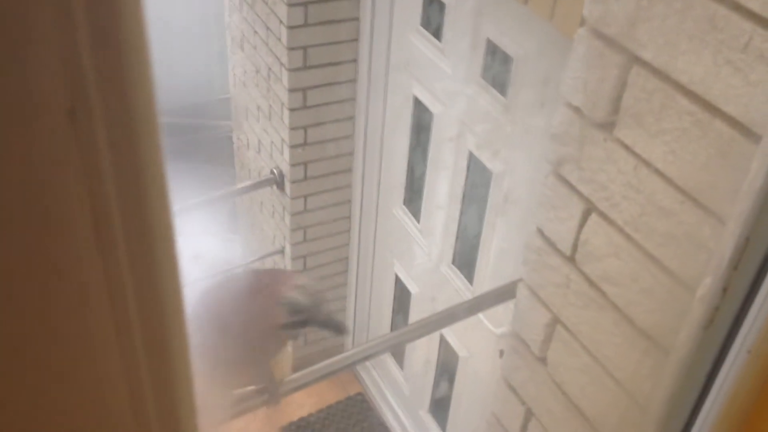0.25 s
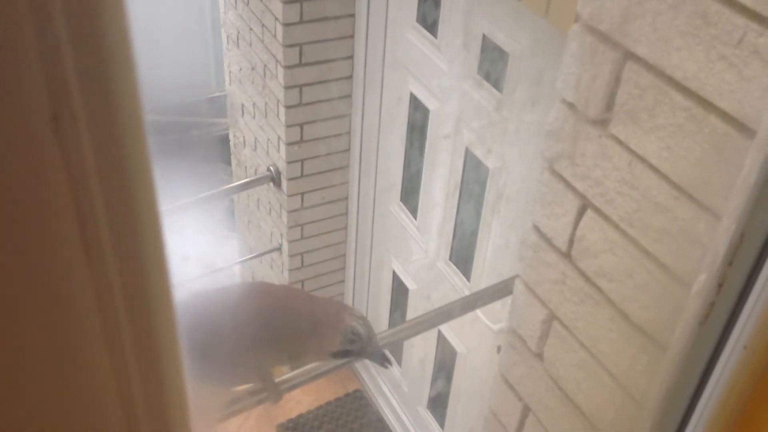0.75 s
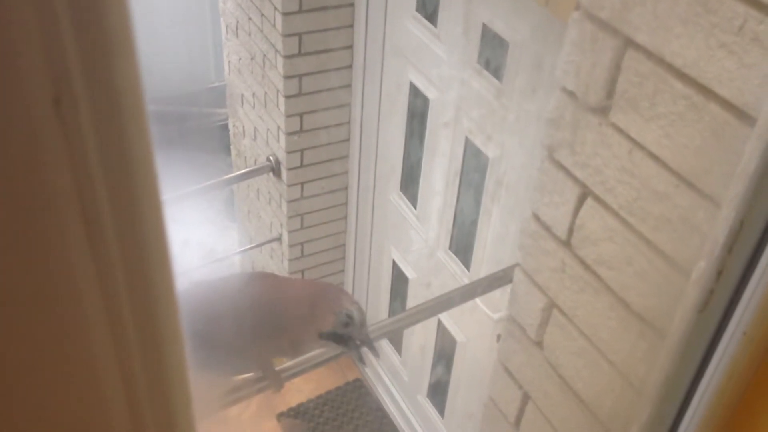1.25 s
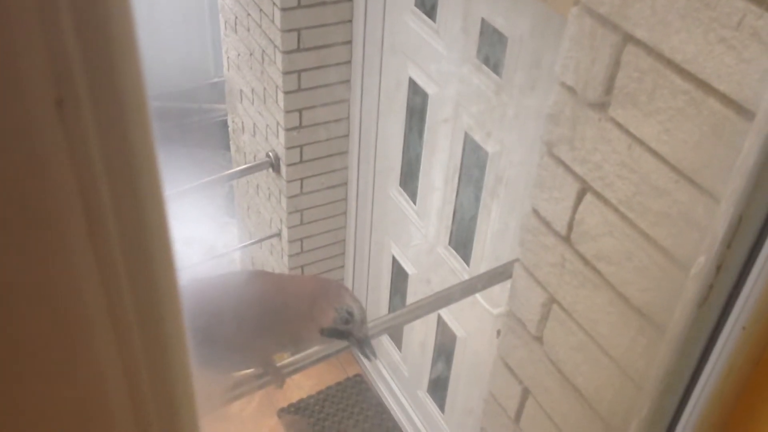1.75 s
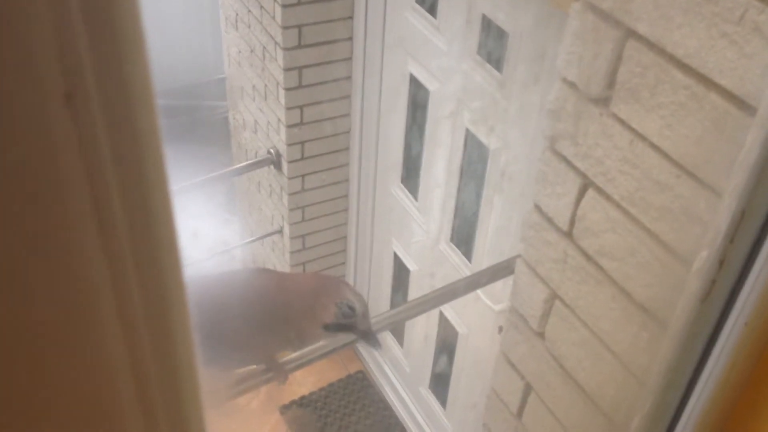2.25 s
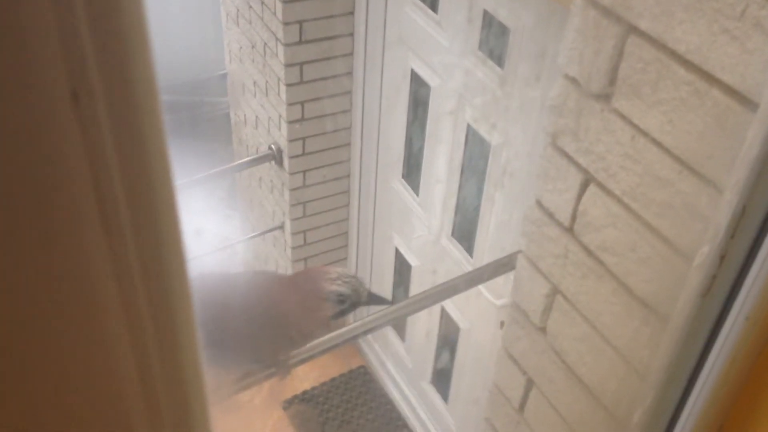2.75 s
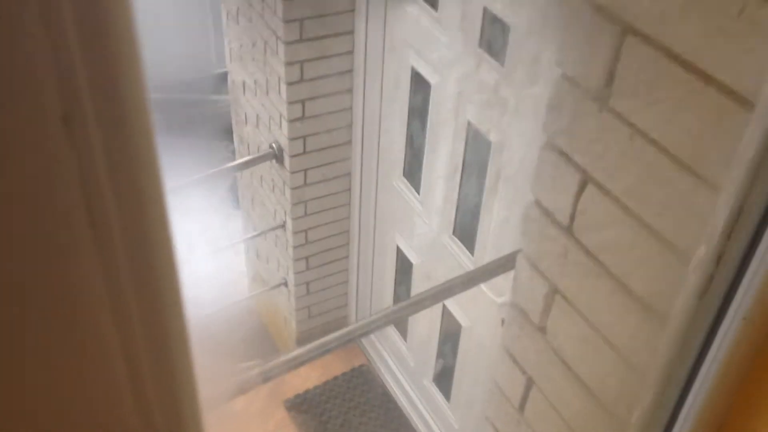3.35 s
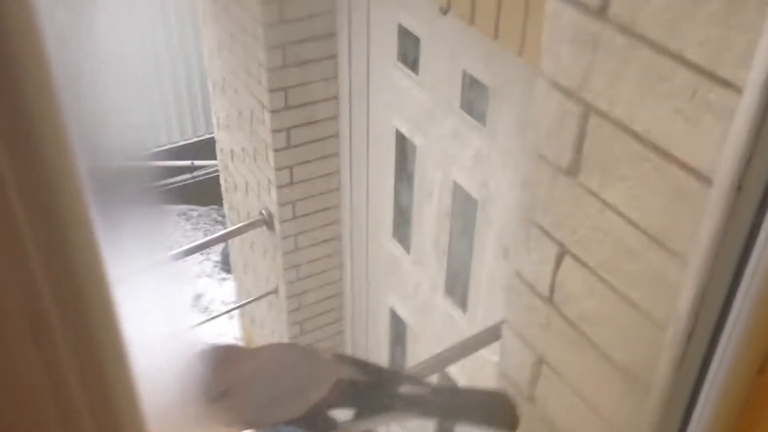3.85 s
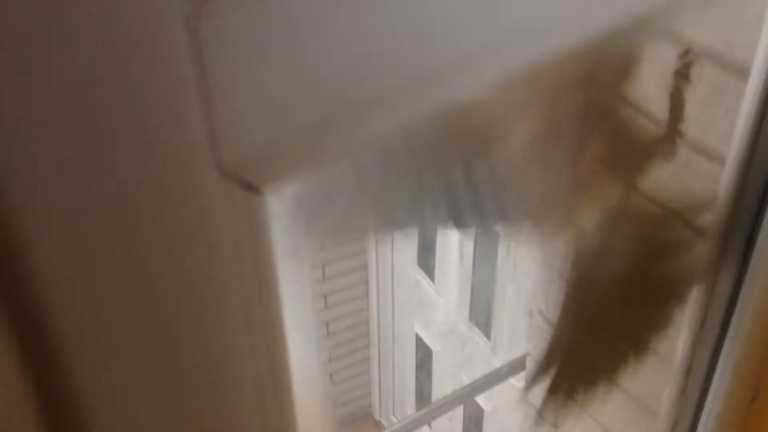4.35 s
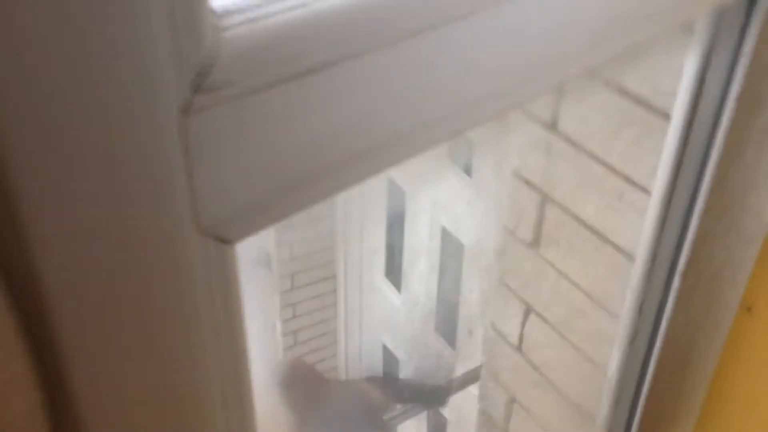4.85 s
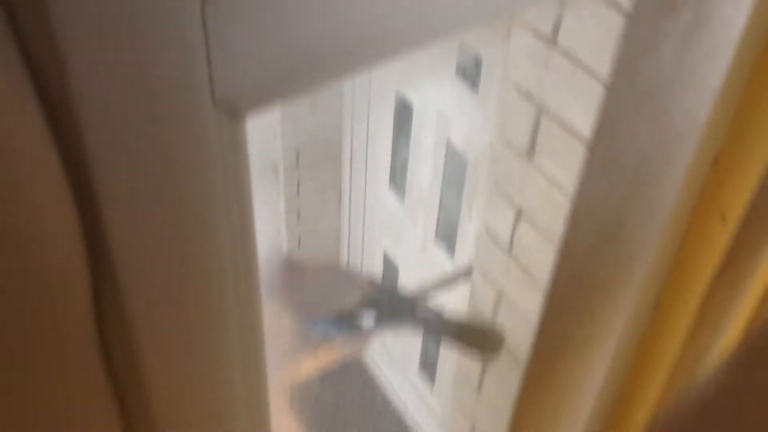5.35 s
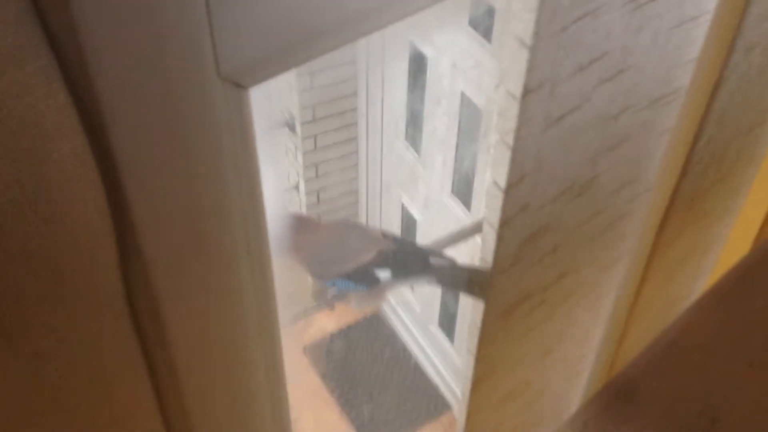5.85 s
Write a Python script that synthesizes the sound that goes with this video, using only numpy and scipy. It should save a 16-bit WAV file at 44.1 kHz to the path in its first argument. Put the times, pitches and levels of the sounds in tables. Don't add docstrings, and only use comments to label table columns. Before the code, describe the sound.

A phone held indoors near a window picks up steady faint hum and hiss. A few small high metallic clicks come first, then a sudden hard knock on glass with a woody frame thud and quick scratching. After a pause a second knock lands, brighter and softer, with claw scrapes and dragging feathers. Dull handling rubs and faint rustles end it in a short room echo.

```python
import sys
import numpy as np
from scipy import signal
from scipy.fft import rfft, irfft, next_fast_len
from scipy.io import wavfile

SR = 44100
rng = np.random.default_rng(int(sys.argv[2]) if len(sys.argv) > 2 else 0)


def output_pcm(signal):
    pcm = np.clip(np.atleast_2d(signal).T, -1, 1) * 32767
    wavfile.write(sys.argv[1], SR, np.round(pcm).astype(np.int16))


def to_linear_factor(level_db):
    exponent = np.asarray(level_db, float) / 20
    return 10 ** exponent


N = 268833

# (frequency [Hz], level [dB rms])
HUM = [(100.1, -104), (200.1, -51), (400.2, -81), (650, -86.5)]
# (frequency [Hz], density [dB per Hz])
AIR = [(30, -6), (60, -3.5), (120, 0), (250, -3), (450, -11.5), (900, -21.5), (1600, -23.5), (3500, -22.5),
       (7000, -24), (15500, -25.5)]
# (time [s], level
# [dB], # centre [Hz], width [octaves])
FIDGETS = [(.066, -58, 2950, 0.71), (.08, -63, 3300, 0.55), (1.478, -65.5, 4330, 0.33),
           (1.489, -61, 2900, 0.98), (2.24, -68.5, 1500, 0.31), (2.645, -59.5, 4200, 0.73),
           (4.836, -61.5, 7500, 0.96), (4.898, -61, 5740, 0.39), (5.142, -62.5, 1600, 0.44),
           (5.146, -67, 3800, .2), (5.251, -61.5, 3000, 0.58), (5.338, -66.5, 1700, 0.68),
           (5.578, -67.5, 2880, .3), (5.605, -65, 8200, .3)]
# (frequency [Hz], t60 [s])
ROOM_T60 = [(60, 0.94), (250, 0.6), (600, 0.49), (1500, 0.48), (3000, 0.28), (8000, 0.12)]
# (frequency [Hz], level [dB])
ROOM_COLOUR = [(60, -6.5), (150, -9), (300, -5.5), (600, -5.5), (1500, 0.5), (3000, -8), (8000, -6.5)]
# (time [s], peak level [dB], cut of the main mode [dB])
TICKS = [
    (1.2289, -41.5, -4),
    (1.2788, -44, -4),
    (1.356, -40, 1),
    (1.48, -47.5, 19),
]
# (frequency [Hz], level [dB], t60 [s])
RAIL = [(2400, -9, .014), (2700, -6, .016), (2880, 0, .024), (3050, -5, .016), (3400, -8, .014),
        (4250, -12, .016), (1850, -20, .012)]
# (time [s], level [dB], centre [Hz], width [octaves], sizzle level [dB])
BEAK = [
    (3.1123, -40, 3900, 1.6, -65.5),
    (3.1251, -40.5, 3170, 0.65, -53),
    (3.1269, -18.5, 3370, 0.89, -62.5),
    (4.4013, -23.5, 3360, 0.64, -67),
    (3.279, -50, 6030, 1.4, -70),
    (4.441, -42.5, 5150, 0.44, -57.5),
    (4.508, -54, 5500, 1.6, -68),
    (4.589, -64, 7960, 1.1, -76),
]
# (frequency [Hz], level struck low [dB], level struck high [dB],
# t60 [s])
PANE_MODES = [(89, -32, -21, .4), (135, -23.5, -18.5, 0.1), (160.3, -3, -1.5, 0.16), (192.3, 3.5, -15, .2),
              (247.8, 7.5, -6.5, 0.26), (268, -4, -33, 0.44), (358.2, 1.5, -2.5, 0.2),
              (452.5, -37.5, -41.5, 0.45), (455, -42.5, -4, 0.32), (525.2, -19.5, -6.5, .1),
              (582.2, -8.5, 3.0, 0.22), (654, -7, 4.5, 0.05), (768, -8, -8, .18), (839, 4.5, -15.5, 0.023),
              (892, -15.5, 3.5, .14), (1008, -23, 6, 0.12), (1129, -20, 0, .08), (1303, -10.5, -19, .12),
         (1233, -21, 3.5, .15), (1415, 0, -20, .1), (1585, -7.5, -8.5, .15), (1725, -15.5, -4, .15),
         (1827, -12, -9.5, .15), (2000, -23, 3.5, .1), (2225, -9.5, -9.5, .08), (2330, 1, -31.5, .08),
         (3300, -8, -14, 0.0305)]
# (time [s], level [dB], contact low-pass [Hz], spot [0 low - 1 high])
BLOWS = [(3.12, -22.5, 246.7, 1), (3.127, -14, 3500, 0.35), (3.131, -24.5, 4500, 0.47),
         (3.138, -25, 1086, 0.77), (3.2557, -51, 500, 0.24), (4.382, -31.5, 260, 0.31),
         (4.4008, -23.5, 3000, 0.7), (4.4056, -25, 3500, 0.15), (4.412, -21, 1340, 0.85),
         (4.439, -60.5, 400, 0.31), (4.486, -48.5, 2000, 1), (3.649, -77, 2000, 0.64),
         (4.90, -59, 900, 0.36), (4.981, -66, 1494, 0.39)]
# (time [s], level [dB], centre [Hz], width
# [octaves], t60 [s])
FEATHERS = [(3.131, -35, 990, 1.7, .2), (3.14, -60.5, 3600, 1.16, 1.22), (3.647, -67, 1480, 0.74, 0.2),
            (4.382, -41.5, 2100, 1.28, 0.422), (4.383, -65.5, 8010, 1.5, 0.22),
            (4.408, -36, 2470, 0.87, 0.13), (4.45, -50.5, 875, 1.8, 0.75), (4.501, -66.5, 1470, 2.7, 1.8),
            (5.352, -61, 1920, .45, 0.14), (5.375, -72, 1675, 1.2, 1.37), (5.444, -73, 1600, .5, 0.24)]
# (time [s], level [dB], centre [Hz], width [octaves], sizzle level [dB])
CLAWS = [
    (3.2538, -34, 2300, 1.23, -68),
    (3.271, -40, 2620, 1.6, -74.5),
    (3.31, -43.5, 4270, 1.26, -49),
    (3.354, -50.5, 3200, .4, -72),
    (4.3726, -42, 4450, 1.13, -52),
    (4.484, -36.5, 3240, 1, -65.5),
    (4.615, -51.5, 3000, 0.67, -74),
]
# (time [s], level [dB], t60 [s])
HANDLING = [
    (3.6, -60.5, 0.21),
    (4.93, -49, 0.26),
    (5.1, -61, .85),
]

SIZZLE_HZ, SIZZLE_OCTAVES, SIZZLE_RISE_S, SIZZLE_T60_S = 11020, 0.75, 0.0021, 0.02
SLIP_LEAD_S, SLIP_DB, SLIP_HZ, SLIP_OCTAVES, SLIP_RISE_S, SLIP_T60_S = 0.011, -19, 2740, 0.22, 0.005, 0.07
MOST_CYCLES, BURST_CYCLES = 80, 8
BURST_DB = -24
ROOM_BURST_DB, ROOM_SCUFF_DB, ROOM_RAIL_DB = 4, -9, -13


def rms_one(x):
    return x / np.sqrt(np.mean(x ** 2) + 1e-20)


def at_hz(points, hz):
    table = np.array(points)
    return np.interp(np.log(hz), np.log(table[:, 0]), table[:, 1])


def sos_filter(x, order, hz, kind):
    return signal.sosfilt(signal.butter(order, hz, kind, fs=SR, output="sos"), x)


def add(out, s, sound):
    at = round(s * SR)
    out[at:at + len(sound)] += sound[:len(out) - at]


def drift(rate_hz):
    r = np.exp(-80 * np.pi * rate_hz / SR)
    white = rng.standard_normal(N // 40 + 2002)
    slow = signal.lfilter([1], [1, -2 * r, r * r], white)[2000:]
    return np.interp(np.arange(N) / 40, np.arange(len(slow)), rms_one(slow))


def hum():
    t = np.arange(N) / SR
    out = np.zeros(N)
    for hz, level_db in HUM:
        level = np.sqrt(2) * to_linear_factor(level_db + 0.6 * drift(4.6))
        out += level * np.sin(2 * np.pi * hz * t + 0.13 * drift(2.5))
    return out


def air():
    size = next_fast_len(N)
    hz = np.maximum(np.arange(size // 2 + 1) * SR / size, 10)
    spectrum = rfft(rng.standard_normal(size)) * to_linear_factor(at_hz(AIR, hz))
    return to_linear_factor(-62.5) * rms_one(irfft(spectrum, size)[:N])


def scuff(out, s, level_db, hz, octaves, rise_s, t60_s):
    t = np.arange(SR // 2) / SR
    white, grain = rng.standard_normal((2, len(t)))
    edges_hz = np.clip(hz * 2 ** (octaves * np.array([-0.5, 0.5])), 50, 0.45 * SR)
    rub = rms_one(sos_filter(white * to_linear_factor(2.0 * grain), 2, edges_hz, "band"))
    rise = np.minimum(t / rise_s, 1) ** 2
    decay = to_linear_factor(-60 * np.maximum(t - rise_s, 0) / t60_s)
    add(out, s, to_linear_factor(level_db) * rub * rise * decay)


def fidgets():
    out = np.zeros(N)
    for s, level_db, hz, octaves in FIDGETS:
        scuff(out, s, level_db, hz, octaves, rise_s=0.005, t60_s=0.035)
    return out


def room(x):
    t = np.arange(SR) / SR
    edges_hz = 45 * 2 ** np.arange(0, 8.6, 1 / 3)
    white = rng.standard_normal((2, SR))
    tail = np.zeros(SR)
    for k, (low, high) in enumerate(zip(edges_hz, edges_hz[1:])):
        band = sos_filter(white[k % 2], 2, [low, high], "band")
        t60_s = at_hz(ROOM_T60, np.sqrt(low * high))
        decay = to_linear_factor(at_hz(ROOM_COLOUR, low) - 60 * t / t60_s)
        tail += band * decay / np.sqrt(t60_s * SR / (6 * np.log(10)))
    tail *= np.clip((t - 0.004) / 0.0067, 0, 1)
    return signal.fftconvolve(x, tail)[:N]


def slips():
    out = np.zeros(N)
    for s, level_db, _ in TICKS:
        scuff(out, s - SLIP_LEAD_S, level_db + SLIP_DB, SLIP_HZ, SLIP_OCTAVES, SLIP_RISE_S, SLIP_T60_S)
    return out


def rail():
    out, t = np.zeros(N), np.arange(SR // 8) / SR
    swell = 1 - np.exp(-t / 0.0015)
    for s, level_db, off_db in TICKS:
        for hz, mode_db, t60_s in RAIL:
            tone = np.sin(2 * np.pi * (hz * t + rng.random())) * to_linear_factor(-60 * t / t60_s)
            cut_db = off_db * (mode_db > -3)
            add(out, s - 0.001, to_linear_factor(level_db + mode_db - cut_db) * swell * tone)
    return out


def beak():
    out = np.zeros(N)
    for s, level_db, hz, octaves, _ in BEAK:
        scuff(out, s, level_db, hz, octaves, rise_s=0.0025, t60_s=0.025)
    return out


def sizzle():
    out = np.zeros(N)
    for s, *_, level_db in BEAK + CLAWS:
        scuff(out, s, level_db, SIZZLE_HZ, SIZZLE_OCTAVES, SIZZLE_RISE_S, SIZZLE_T60_S)
    return out


def ring(force, hz, t60_s):
    r, w = to_linear_factor(-60 / (t60_s * SR)), 2 * np.pi * hz / SR
    return signal.lfilter([0, np.sin(w)], [1, -2 * r * np.cos(w), r * r], force + 1e-18)


def pane():
    near, burst, modes = np.zeros(N), np.zeros(N), PANE_MODES
    push_off = sos_filter(signal.unit_impulse(SR // 2), 4, 95, "high")
    signs = [-1 if mode[0] < 400 else (-1) ** k for k, mode in enumerate(modes)]
    for s, level_db, contact_hz, spot in BLOWS:
        force = sos_filter(push_off, 3, contact_hz, "low")
        for (hz, low_db, high_db, t60_s), sign in zip(modes, signs):
            mode_db = low_db + spot * (high_db - low_db)
            push = sign * to_linear_factor(level_db + mode_db) * force
            add(near, s, ring(push, hz, min(t60_s, MOST_CYCLES / hz)))
            add(burst, s, ring(push, hz, BURST_CYCLES / hz))
    return near, burst


def feathers():
    out = np.zeros(N)
    for s, level_db, hz, octaves, t60_s in FEATHERS:
        scuff(out, s, level_db, hz, octaves, 0.0071 * t60_s, t60_s)
    return out


def claws():
    out = np.zeros(N)
    for s, level_db, hz, octaves, _ in CLAWS:
        scuff(out, s, level_db, hz, octaves, rise_s=0.0042, t60_s=0.057)
    return out


def handling():
    out = np.zeros(N)
    for s, level_db, t60_s in HANDLING:
        scuff(out, s, level_db, 130, 1.1, 0.15 * t60_s, t60_s)
    return out


def scene():
    thump, burst = pane()
    rubs = fidgets() + slips() + beak() + sizzle() + feathers() + claws() + handling()
    ticks = rail()
    near = thump + to_linear_factor(BURST_DB) * burst + rubs + ticks
    far = room(to_linear_factor(ROOM_BURST_DB) * burst + to_linear_factor(ROOM_SCUFF_DB) * rubs + to_linear_factor(ROOM_RAIL_DB) * ticks)
    return (near + far + hum() + air())[None]


def low_pass(x):
    return signal.sosfilt(signal.butter(12, 15590, fs=SR, output="sos"), x)


def record(dry):
    coloured = sos_filter(dry, 2, 50, "high")
    rounded = 0.8 * np.tanh(coloured / 0.8)
    cut = signal.sosfilt(signal.cheby2(20, 50, 15800, fs=SR, output="sos"), rounded)
    return low_pass(cut)


dry = scene()
out = record(dry)
output_pcm(out)
```